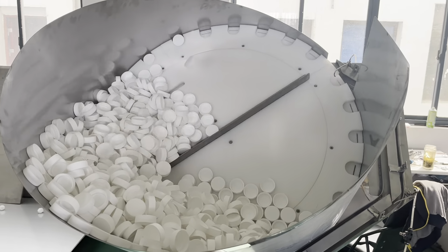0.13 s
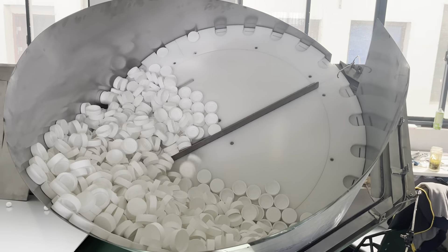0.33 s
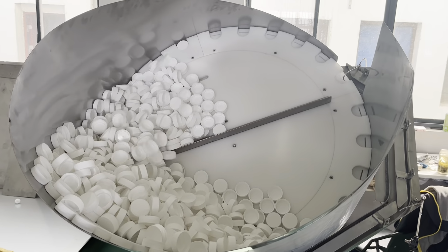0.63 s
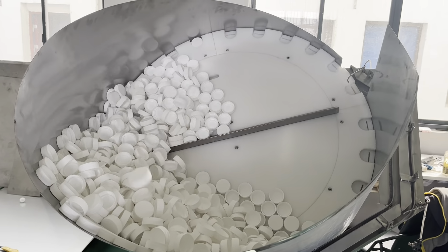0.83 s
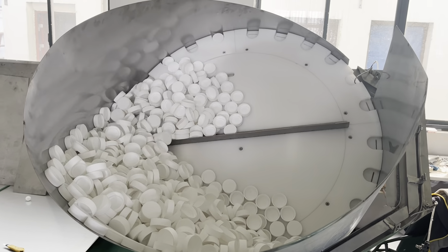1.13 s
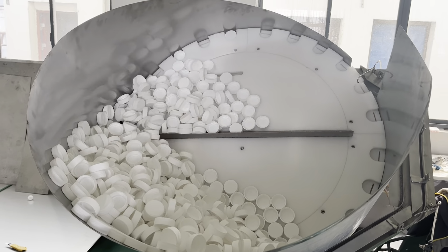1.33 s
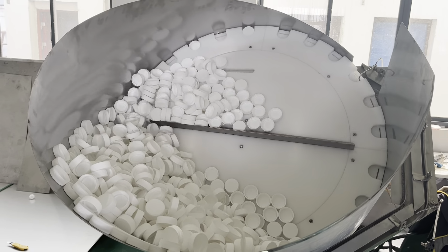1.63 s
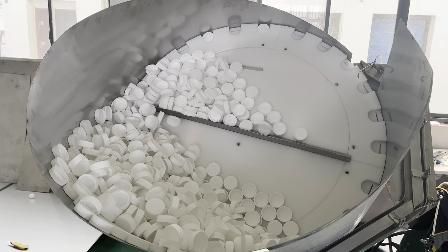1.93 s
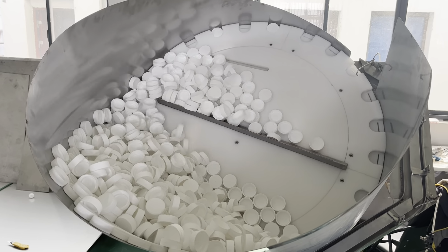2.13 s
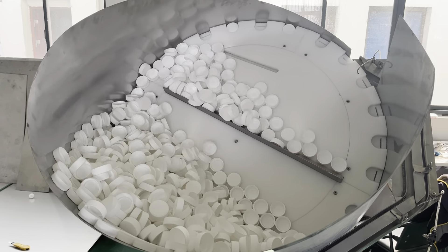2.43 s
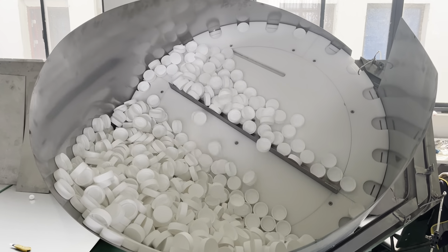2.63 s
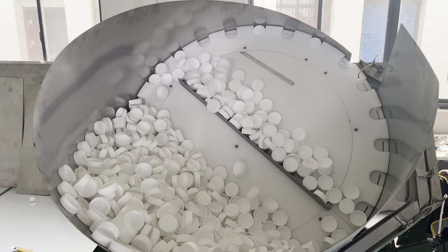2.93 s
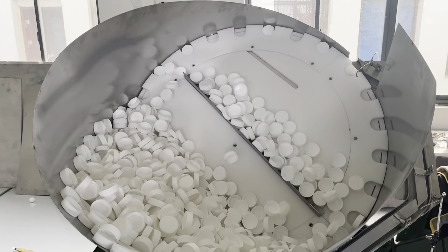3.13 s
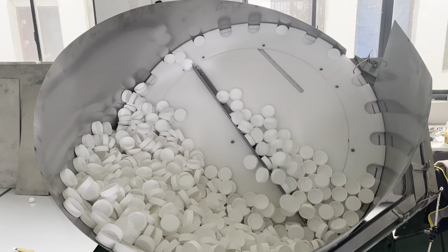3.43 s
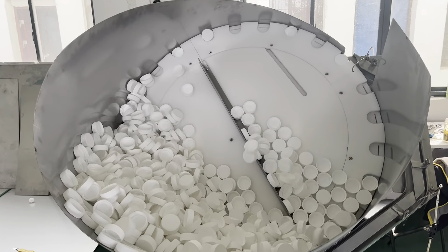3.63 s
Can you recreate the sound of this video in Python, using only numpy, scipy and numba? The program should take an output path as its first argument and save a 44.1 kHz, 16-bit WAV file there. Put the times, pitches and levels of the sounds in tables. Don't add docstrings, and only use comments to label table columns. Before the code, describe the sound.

Plastic caps clack, slide and patter in a rotating steel bowl under twice-a-second air puffs and constant hiss; late on, a pile spills in a dense clatter. Workshop, close phone microphone with wind thumps.

```python
import sys
import numpy as np
from scipy import signal
from scipy.fft import rfft, irfft, next_fast_len
from scipy.io import wavfile
from scipy.ndimage import uniform_filter1d
from numba import njit

SR = 44100
rng = np.random.default_rng(int(sys.argv[2]) if len(sys.argv) > 2 else 0)


def wrap_up_sound(samples):
    columns = np.atleast_2d(samples).T
    tamed = np.clip(columns, -1, 1)
    steps = np.round(tamed * 32767).astype(np.int16)
    wavfile.write(sys.argv[1], SR, steps)


def volts(x):
    e = np.asarray(x, float) / 20
    return 10 ** e


N = 167139
NOISE_N = next_fast_len(N)
T = np.arange(N) / SR
F = np.maximum(np.arange(N // 2 + 1) * SR / N, 1)

# (frequency [Hz], level [dB])
SHOP_COLOUR = [(40, -18), (150, 1), (350, -2.5), (700, -5.5), (1400, -8.5), (2400, -9), (4000, -4.5),
               (8000, -25)]
# (frequency [Hz], level [dB])
MOTOR_TONES = [(2713, -45), (5426, -51)]
# (time [s], level [dB])
WIND_LEVEL = [(0.0, -39.5), (0.7, -25.5), (0.99, -21.5), (1.18, -24.5), (1.89, -31.5), (2.64, -44),
              (2.98, -37), (3.19, -43.5), (3.49, -31.5), (3.79, -41.5)]
# (frequency [Hz], level [dB])
WIND_COLOUR = [(25, -24), (45, -5), (70, 0), (140, -5), (250, -16), (500, -28), (1000, -42)]
# (time [s], level [dB])
EDDY_LEVEL = [(0, -42), (.55, -37.5), (.85, -34.5), (1.25, -44), (1.45, -35), (1.7, -32.5), (1.95, -39),
              (2.34, -37), (2.5, -51), (3.79, -40)]
# (frequency [Hz], level [dB])
EDDY_COLOUR = [(90, -24), (170, -3), (260, -0.5), (350, -7.5), (600, -25)]
# (middle [s], length [s], pitch [Hz], peak [dB])
BUFFETS = [(.28, 0.018, 116, -20.5), (0.369, 0.038, 71.5, -26.5), (.70, 0.021, 91, -22),
           (0.789, 0.017, 68, -13.5), (.89, 0.018, 106, -19.5), (.94, 0.014, 74, -15),
           (.98, 0.02, 77, -9.5), (1.045, 0.014, 80, -14), (1.077, 0.0056, 159, -8.5),
           (1.169, 0.005, 153, -12), (1.185, 0.0073, 75, -9.5), (1.33, 0.0045, 128, -9.5),
           (1.40, 0.024, 78, -24.5), (1.539, 0.006, 235, -15.5), (1.567, 0.0067, 230, -19.5),
           (1.584, 0.007, 82, -15), (1.789, 0.0089, 100, -21), (2.35, 0.012, 140, -20.5),
           (1.629, 0.0073, 150, -20), (1.664, .007, 192, -21), (0.626, .008, 290, -21),
           (0.541, .008, 209, -24.5), (.825, 0.0075, 191, -22.5), (2.347, 0.011, 248, -23.5),
           (2.438, .03, 60, -28.5), (1.11, 0.018, 62, -16.5), (2.898, 0.012, 82, -23.5),
           (3.6, 0.019, 114, -26)]
# (opens [s], shuts [s], level [dB])
PUFFS = [
    (-.3, 0.038, 4.5),
    (0.22, 0.677, 1.5),
    (0.868, 1.22, 0),
    (1.385, 1.734, 1),
    (1.893, 2.255, 2),
    (2.406, 2.773, 0),
    (2.931, 3.286, -1),
    (3.447, 3.81, -2),
]
# (frequency [Hz], level [dB])
JET_COLOUR = [(2900, -10.5), (3350, 1.5), (3900, -9.5), (5300, -7), (6500, 1), (8000, -3), (9200, -5),
              (12000, -7), (15500, -16.5)]
# (time [s], level [dB])
LEAK_LEVEL = [(0.0, -33), (0.04, -31.5), (0.45, -27.5), (0.46, -34.5), (1.14, -27), (1.22, -31),
              (1.81, -31.5), (2.21, -29.5), (2.24, -30.5), (2.53, -29), (2.6, -33.5), (3.02, -28),
              (3.09, -33), (3.62, -30.5), (3.77, -33), (3.79, -25)]
# (frequency [Hz], level [dB])
LEAK_COLOUR = [(1500, -14), (4000, -18), (6000, -8), (8500, -2), (11500, -3), (13500, -1.5), (15000, 3),
               (16000, -15)]
# (time [s], level [dB])
HEAP_LEVEL = [(0.0, -32.5), (0.5, -30.5), (1.94, -31), (2.14, -33), (2.5, -32), (3.11, -26), (3.34, -26),
              (3.6, -28.5), (3.79, -28.5)]
# (frequency [Hz], time to fade 60 dB [s], level [dB])
CAP_MODES = [(1780, 0.022, 0.5), (2136, 0.025, -1), (2500, 0.034, -1), (2740, 0.02, -3.5),
             (3425, 0.041, -7.5), (4470, 0.0092, -1)]
# (frequency [Hz], time to fade 60 dB [s], level [dB])
BOWL_MODES = [(422, 0.11, -4.5), (625, 0.024, 6), (800, 0.054, -4), (1047, 0.045, 2), (1277, 0.029, 5)]
# (time [s], length [s], level [dB])
SLIDES = [
    (.787, 0.03, -32),
    (1.386, 0.014, -24),
    (3.146, 0.014, -30),
    (3.206, 0.042, -21),
    (3.279, 0.06, -25.5),
    (3.67, 0.072, -30),
    (2.0, 0.05, -35),
    (2.2, 0.055, -36),
    (0, .03, -30),
]
# (time [s], length [s], level [dB])
SCRAPES = [
    (.228, 0.014, -28),
    (.60, 0.1, -29),
    (1.32, 0.033, -25.5),
    (2.33, 0.075, -36),
    (3.205, 0.042, -27.5),
    (2.72, 0.32, -37),
]
# (time [s], peak [dB], pitch [Hz])
CLACKS = [(0.2206, -15, 2370), (0.2972, -20, 2190), (0.3646, -17, 2380), (0.398, -16, 2440),
          (0.4279, -18, 2020), (0.5734, -17, 2570), (0.6549, -19, 2360), (0.7266, -13, 1830),
          (0.7865, -14, 2430), (0.7986, -9, 2420), (1.1682, -20, 2710), (1.226, -17, 2130),
          (1.2955, -24, 2210), (1.3214, -23, 2710), (1.3818, -11, 2540), (1.4376, -16, 2660),
          (1.478, -18, 2750), (1.498, -13.5, 2720), (1.5504, -23, 2170), (1.6277, -17, 2280),
          (1.7554, -21, 2700), (1.9485, -21, 2450), (2.0015, -17, 2430), (2.036, -20, 2760),
          (2.0744, -13.5, 2700), (2.1757, -14.5, 2580), (2.2197, -19, 2740), (2.2198, -15, 2520),
          (2.248, -12.5, 2710), (2.3216, -16, 2360), (2.3296, -14, 2530), (2.4423, -20, 2850),
          (2.4763, -19, 2620), (2.6035, -16, 2530), (2.638, -18, 2710), (2.6748, -16, 2710),
          (2.832, -20, 2530), (2.8449, -15, 2500), (2.8762, -16, 2540), (2.8858, -18, 2120),
          (2.9033, -13, 2130), (2.9256, -15, 2250), (2.9618, -9.5, 2540), (3.0126, -13, 1700),
          (3.03, -12, 2510), (3.0879, -14, 2420), (3.102, -11, 2500)]
# (time [s], peak [dB], pitch [Hz])
SPILL = [(3.1458, -20, 2220), (3.1458, -6, 2300), (3.1794, -17, 2500), (3.2022, -10, 2250),
         (3.2088, -7.5, 1860), (3.273, -12, 2160), (3.3192, -13, 2380), (3.3374, -13, 1950),
         (3.38, -21, 2120), (3.4022, -16, 2280), (3.4485, -16, 2430), (3.4541, -21, 1860),
         (3.4701, -13, 2500), (3.4985, -12, 2040), (3.5435, -14, 1770), (3.5893, -16, 2730),
         (3.6217, -22, 2700), (3.6696, -14, 2600), (3.6928, -13, 2410), (3.715, -14, 2080),
         (3.7204, -17, 2660), (3.7774, -17, 2460),
         (3.2137, -6, 1930),
    (3.218, -6, 2050),
    (3.2254, -14, 1970),
    (3.2364, -13, 2080),
    (3.2424, -12, 2040),
    (3.25, -14, 2500),
    (3.286, -11, 1760),
    (3.2941, -14, 1760),
    (3.3044, -17, 2470),
    (3.3108, -13, 1780),
]
# (time [s], peak [dB], pitch [Hz])
KNOCKS = [
    (0.23, -19.5, 420),
    (0.601, -16.5, 443),
    (0.792, -18.5, 840),
    (1.068, -15.5, 415),
    (1.322, -18, 1054),
    (1.38, -28, 635),
    (1.53, -27, 530),
    (2.717, -24, 394),
]
# (time [s], peak [dB])
TICKS = [
    (0.2327, -22),
    (3.3016, -7.5),
    (3.6433, -14),
]
# (time [s], peak [dB])
SNAPS = [
    (1.3826, -9),
    (.7872, -19),
    (2.042, -20),
]
# (frequency [Hz], left lead [rad], likeness [0-1], left minus right [dB])
PORTS = [(60, 0, 0.92, -0.4), (710, 0.16, 0.77, 4), (1620, -2.5, 0.49, 3), (1790, 0, 0.97, -0.5),
         (2330, 0.71, 0.96, 1.5), (3330, 0.5, 0.43, 0), (5350, -1.2, 0.1, 2.5), (6920, -1.46, 1, 3)]


def unit(x):
    return x / np.sqrt(np.mean(x ** 2))


def curve(rows):
    return volts(np.interp(T, *np.array(rows).T))


def walk(rate_hz):
    hold = int(SR / rate_hz)
    steps = np.repeat(rng.standard_normal(N // hold + 1), hold)
    return 1.48 * uniform_filter1d(uniform_filter1d(steps, hold), hold)[:N]


def rush(colour, swell_db, flicker_db, rate_hz):
    hz, db = np.array(colour, float).T
    f = np.maximum(np.arange(NOISE_N // 2 + 1) * SR / NOISE_N, 1)
    spectrum = rfft(rng.standard_normal((3, NOISE_N))) * volts(np.interp(np.log(f), np.log(hz), db))
    swell = walk(rate_hz)
    out = 0
    for octave in np.arange(int(np.log2(hz[0])), 15):
        band = np.cos(np.pi / 2 * np.clip(np.log2(f) - octave, -1, 1)) ** 2
        gain = volts(swell_db * swell + flicker_db * walk(rate_hz))
        out = out + irfft(spectrum * band, NOISE_N)[:, :N] * gain
    return unit(out)


@njit
def rings(start, hz, fall, size, n):
    out = np.zeros(n)
    for k in range(len(start)):
        turn = np.exp(2j * np.pi * hz[k] / SR - fall[k])
        z = size[k] + 0j
        for i in range(start[k], min(n, start[k] + int(6 / fall[k]))):
            z *= turn
            out[i] += z.imag
    return out


def ring(s, hz, t60, size):
    s, hz, t60, size = (np.array(v, float).ravel() for v in np.broadcast_arrays(s, hz, t60, size))
    start = np.clip(s * SR, 0, N).astype(np.int64)
    return rings(start, hz, np.log(1000) / (t60 * SR), size, N)


def bursts(rows):
    out = 0
    for start, length, db in rows:
        rise = np.clip((T - start) / 0.0037, 0, 1)
        out = out + volts(db) * rise * np.exp(-(np.clip(T - start, 0, 9) / length) ** 2)
    return out


def echoed(x):
    room_t60_s, n = 0.14, int(0.2 * SR)
    tail = rng.standard_normal((2, n)) * volts(-60 * T[:n] / room_t60_s)
    bounced = signal.fftconvolve(x[None], unit(tail) / np.sqrt(n), axes=1)[:, :N]
    return np.vstack([x, bounced])


def machine():
    whine = 0
    for hz, db in MOTOR_TONES:
        whine = whine + np.sqrt(2) * volts(db + walk(3.45)) * np.sin(2 * np.pi * hz * T)
    return whine + volts(-30) * rush(SHOP_COLOUR, 1.0, 0.78, 7.96)


def wind():
    out = curve(WIND_LEVEL) * rush(WIND_COLOUR, 2.0, 2.0, 14)
    out += curve(EDDY_LEVEL) * rush(EDDY_COLOUR, 2.3, 2.1, 18)
    for middle, length, hz, db in BUFFETS:
        turn = 2 * np.pi * hz * (T - middle)
        swing = np.cos(turn) + 0.38 * np.cos(2 * turn + 0.36) + 0.15 * np.cos(3 * turn + 1.5)
        out[0] += volts(db) * np.exp(-((T - middle) / length) ** 2) * swing
    return out


def air():
    jet_db, leak_db, swell_db, edge_s = -24.5, 5, 5.5, 0.05
    gate = 0
    for opens, shuts, db in PUFFS:
        is_open = np.clip(np.minimum(T - opens, shuts - T) / edge_s + 0.5, 0, 1)
        gate = gate + volts(db + swell_db * (T - shuts) / 0.92) * is_open
    jet = volts(jet_db) * gate * rush(JET_COLOUR, 1.45, 0.58, 14)
    leak = volts(leak_db) * curve(LEAK_LEVEL) * rush(LEAK_COLOUR, 1.0, 1.5, 10.04)
    return jet + leak


def patter(modes, per_s):
    hit_scatter_db, mode_scatter_db, pitch_scatter = 2.2, 3.2, 0.064
    hz, t60, db = np.array(modes).T
    chance = rng.random((3, int(per_s * N / SR), 2))
    spread = rng.standard_normal((*chance.shape, len(hz)))
    when = chance[..., :1] * N / SR
    hit_db = -hit_scatter_db * np.log(chance[..., 1:])
    size = volts(hit_db + db + mode_scatter_db * spread[:, :, 0])
    pitch = hz * (1 + pitch_scatter * spread[:, :, 1])
    return unit(np.array([ring(when[k], pitch[k], t60, size[k]) for k in range(3)]))


def heap_of_caps():
    level = curve(HEAP_LEVEL) * volts(0.4 * walk(15))
    loose = level * volts(-10) * patter(CAP_MODES[1:4], 70)[0]
    plastic = (level + bursts(SLIDES)) * patter(CAP_MODES, 1500)
    steel = (volts(-3) * level + bursts(SCRAPES)) * patter(BOWL_MODES, 600)
    return plastic + steel, loose


def single_caps():
    s, db, hz = np.array(CLACKS + SPILL).T[:, :, None]
    clack = ring(s, hz * np.array([1, 0.825, 1.18, 1.78]), np.array([0.031, 0.019, 0.018, 0.006]),
                 volts(db + np.array([-2, -13, -10, -12])))
    s, db, hz = np.array(KNOCKS).T[:, :, None]
    knock = ring(s, hz * np.array([1, 1.55, 2.3]), 0.047, volts(db + np.array([-1.5, -5, -9])))
    s, db = np.array(TICKS).T[:, :, None]
    tick = ring(s, np.array([4600, 7500, 10300, 13300]), 0.003, volts(db + np.array([-6, 4, 6, 3.0])))
    s, db = np.array(SNAPS).T[:, :, None]
    snap = ring(s, np.array([1300, 2300, 3450, 4600]), 0.0049, -volts(db + np.array([-8, -2.0, 2.0, 4])))
    return clack + knock + tick + snap


def caps():
    heap, loose = heap_of_caps()
    return heap + echoed(loose + single_caps())


def scene():
    opposed_hz, lag_s, treble_like = 8330, 0.000139, 0.955
    hz, lead, like, pan_db = np.array(PORTS + [(opposed_hz, -np.pi, treble_like, 0)]).T

    def at(values):
        return np.interp(np.log(F), np.log(hz), values)

    lead = at(lead) - 2 * np.pi * lag_s * np.maximum(F - opposed_hz, 0)
    like = np.clip(at(like), 0, 1)
    side = np.array([[0.5], [-0.5]])
    s = rfft(machine() + wind() + air() + caps())
    shared = np.sqrt(like) * np.exp(1j * lead * side) * s[0]
    separate = np.sqrt(1 - like) * s[1:]
    return irfft((shared + separate) * volts(at(pan_db) * side), N)


def band_limit(x):
    return signal.sosfilt(signal.butter(12, 15760, fs=SR, output="sos"), x)


def record(dry):
    x = signal.sosfilt(signal.butter(2, 30, "high", fs=SR, output="sos"), dry)
    x = signal.sosfilt(signal.ellip(8, 0.2, 70, 15800, fs=SR, output="sos"), x)
    return band_limit(x)


dry = scene()
out = record(dry)
wrap_up_sound(out)
```